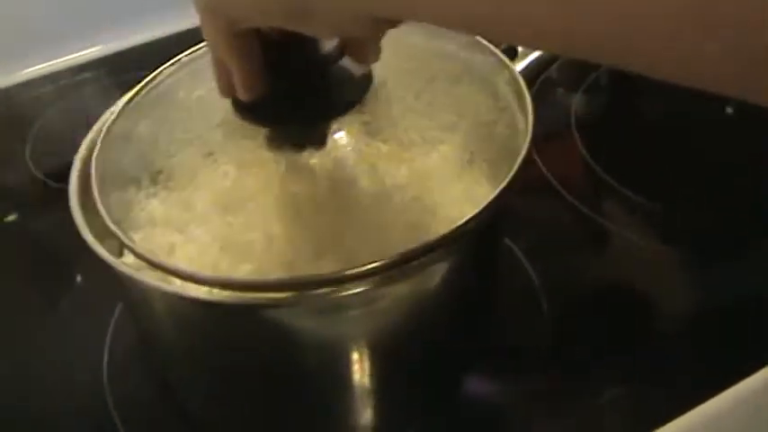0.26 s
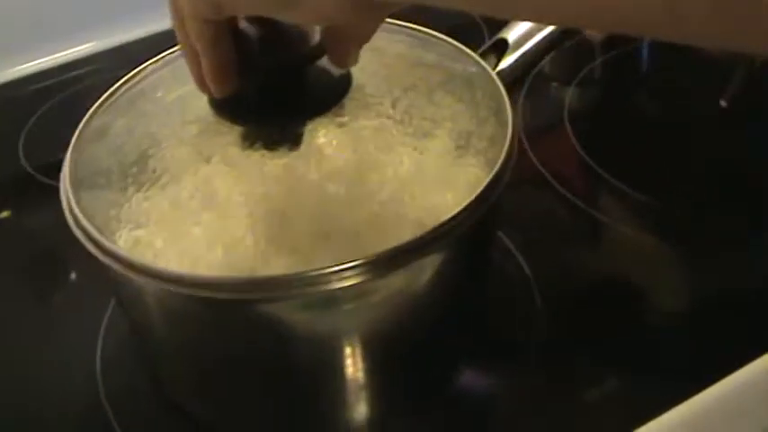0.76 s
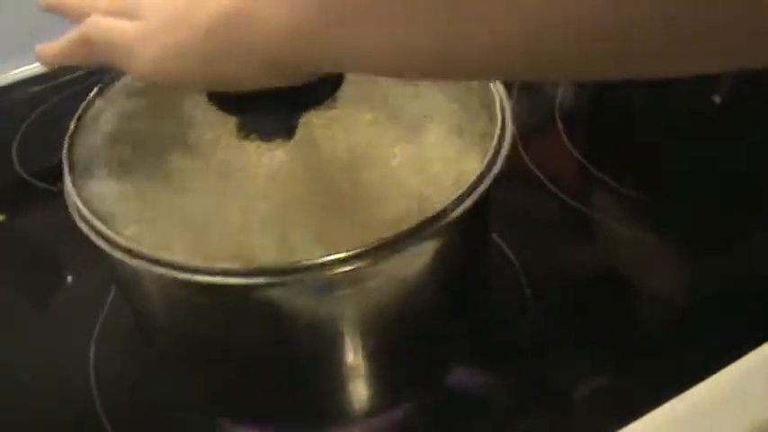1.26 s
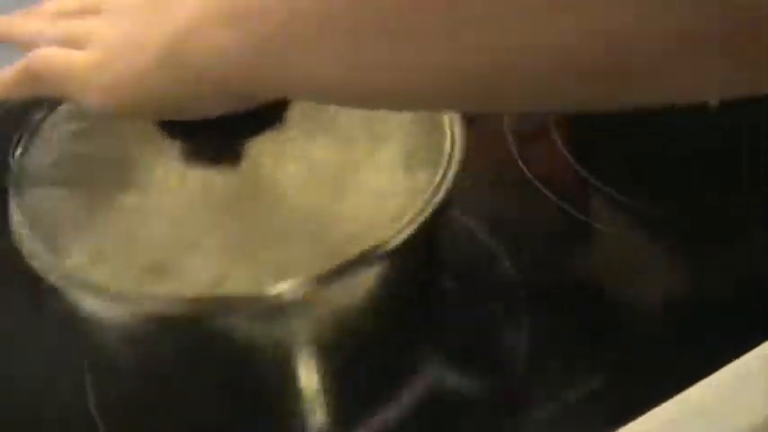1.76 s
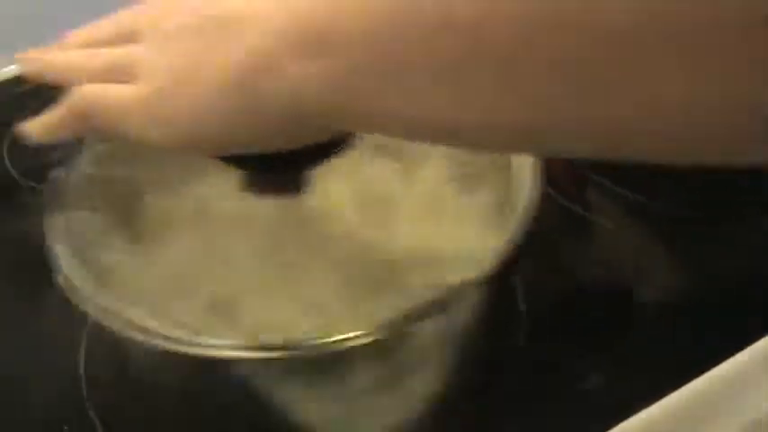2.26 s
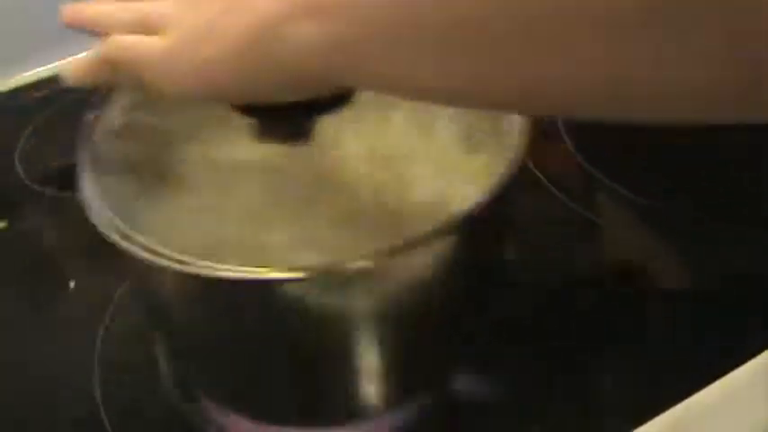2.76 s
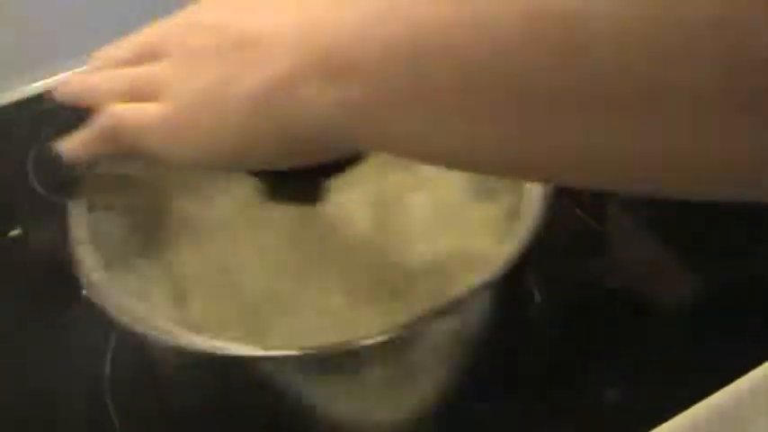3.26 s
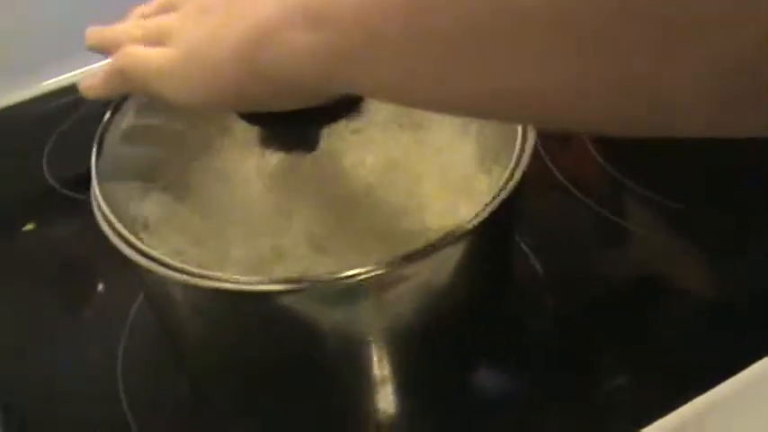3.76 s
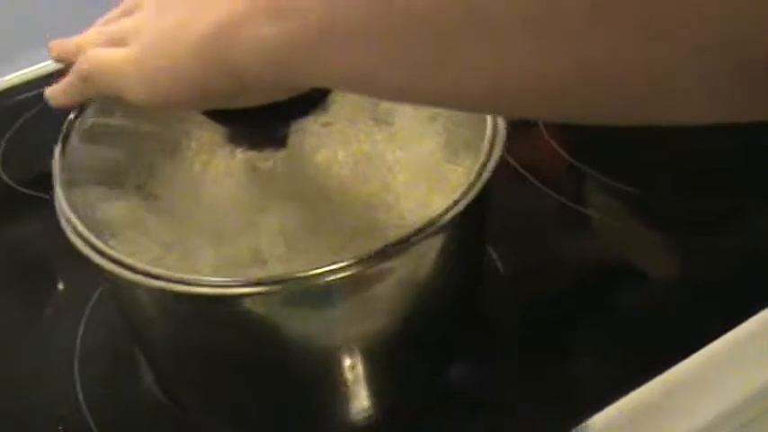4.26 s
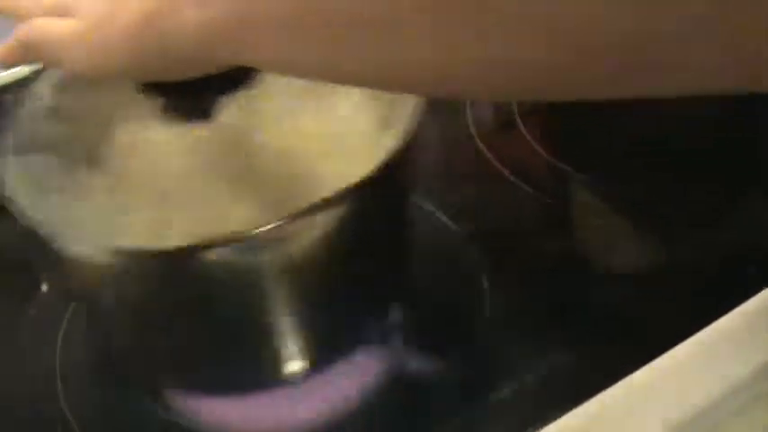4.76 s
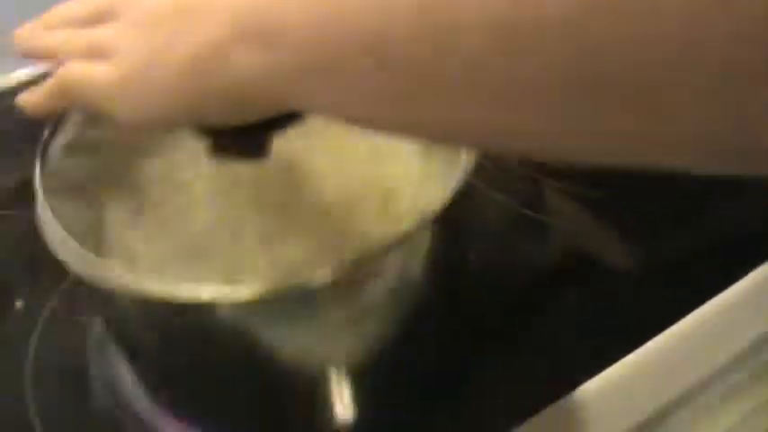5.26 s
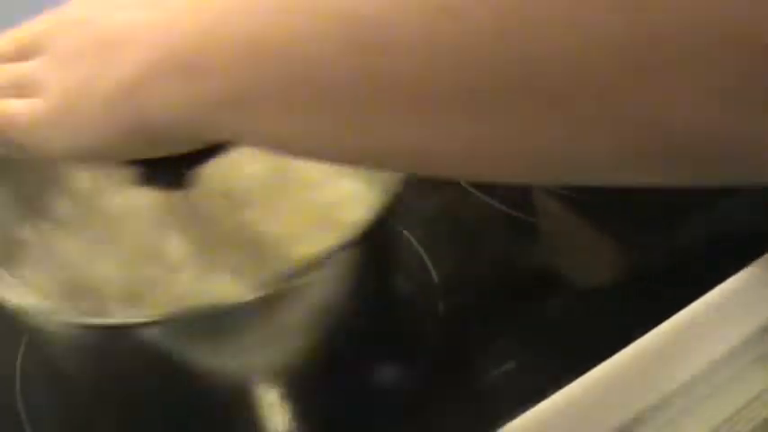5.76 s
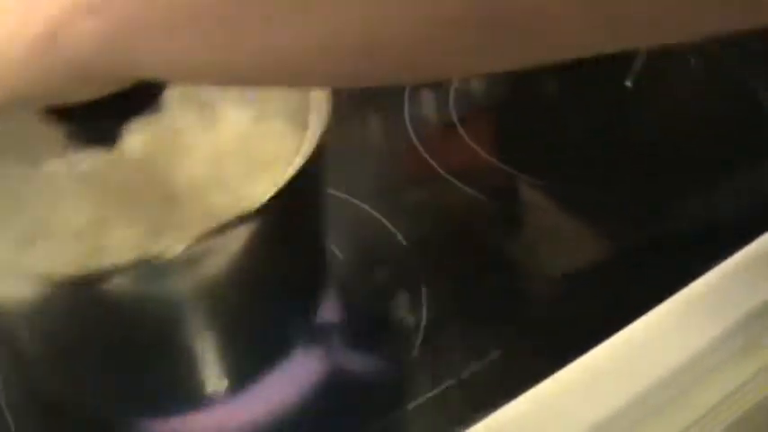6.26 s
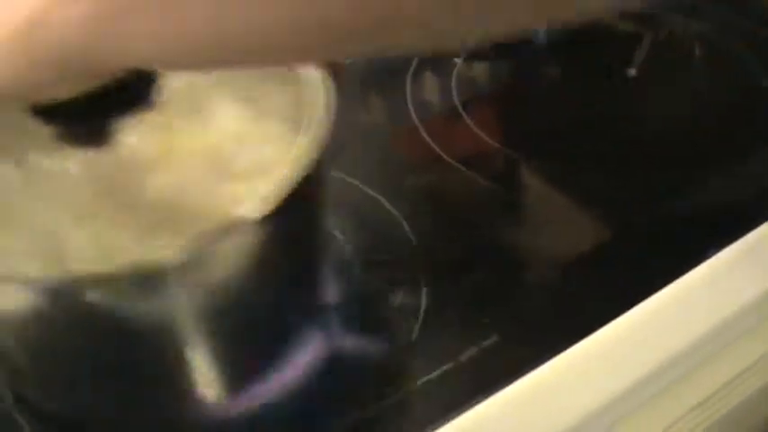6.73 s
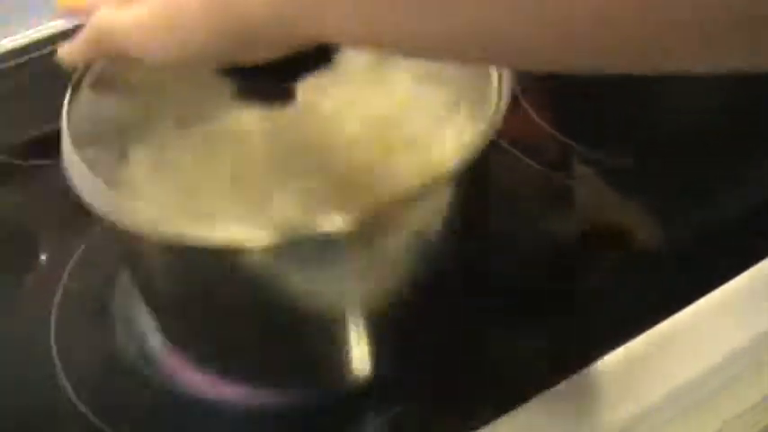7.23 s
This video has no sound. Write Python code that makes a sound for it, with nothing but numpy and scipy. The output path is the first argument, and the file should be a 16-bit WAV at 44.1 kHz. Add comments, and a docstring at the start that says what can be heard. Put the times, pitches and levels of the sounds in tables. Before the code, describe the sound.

Popcorn bursts with sharp cracks and hollow thumps in a lidded pan, which scrapes and rustles, knocks on the hob, then rings at the rim.

```python
"""Popcorn in a lidded saucepan

Popcorn pops under a glass lid, close to a camera in a kitchen. Each kernel cracks and rings the air in the pan.
The lid clacks and the pan knocks on the glass hob: noise bursts through resonances.
As the pan is shaken its base scrapes, corn rustles in sizzling oil and the rim sings: filtered random clicks.
Oil spits and steam hiss as coloured noise; the stove top rumbles below."""
import sys
import numpy as np
from scipy import signal
from scipy.fft import rfft, irfft, next_fast_len
from scipy.io import wavfile
from scipy.ndimage import map_coordinates

SR = 44100
rng = np.random.default_rng(int(sys.argv[2]) if len(sys.argv) > 2 else 0)


def store_pcm(level_fs):
    """Save levels as 16-bit WAV."""
    pcm = np.round(np.clip(level_fs, -1, 1) * 32767).astype(np.int16)
    wavfile.write(sys.argv[1], SR, np.atleast_2d(pcm).T)


N = 330529
T = np.arange(SR // 2) / SR  # s within one blow
T_SCENE = np.arange(N) / SR  # s

# bursting kernels: t/s, crack level/dB, pan air ring level/dB, thump level/dB, thump f/Hz
POPS = [(0.0447, -20, -33, -26, 485), (0.0649, -31, -23, -22, 468), (0.0923, -21, -27.5, -34, 337),
        (0.403, -25.5, -28, -21, 363), (0.4288, -19.5, -31.5, -25.5, 361), (0.6171, -44, -37.5, -31, 227),
        (0.7385, -28.5, -65, -59, 240), (0.843, -39.5, -38.5, -37.5, 220), (1.045, -35, -35, -36, 255),
        (1.0897, -25, -58, -50, 214), (1.135, -30, -37, -53, 203), (1.2799, -27.5, -34, -22.5, 232),
        (1.4518, -29, -36, -19.5, 242), (1.513, -30, -29.5, -23.5, 310), (1.79, -30.5, -27, -19.5, 254),
        (2.0294, -26, -37, -20, 266), (3.3489, -24, -24, -21.5, 304), (3.5085, -25, -26, -17.5, 317),
        (3.5265, -28, -28, -17, 347), (3.6145, -27.5, -27, -16.5, 312), (4.4945, -29, -27, -16.5, 330),
        (5.435, -30.5, -24.5, -16, 350), (5.7895, -31.5, -26, -18, 341), (6.5797, -24.5, -29.5, -17.5, 282)]
# pan knocks and grinds on hob: t/s, ring level/dB, thud level/dB, contact level/dB, contact length/s
KNOCKS = [(3.744, -25.5, -20, -22, 0.015), (3.766, -26, -22, -28, 0.017), (3.794, -23, -24, -25, 0.0092),
          (3.886, -28.5, -26.5, -42, 0.014), (3.927, -24, -19.5, -18.5, 0.0087),
          (3.94, -24.5, -21, -26, 0.02), (3.985, -26.5, -22, -26.5, 0.01),
          (4.106, -20.5, -18.5, -19.5, 0.015), (4.125, -36, -26, -32, 0.02),
          (4.2268, -24.5, -20, -22.5, 0.012), (4.41, -18, -17.5, -35, 0.014),
          (4.427, -34, -19.5, -19.5, 0.15), (4.476, -26, -25, -25, 0.025)]
# lid clacks on rim: t/s, ring level/dB, click level/dB
LID_CLACKS = [(0.187, -22.5, -27), (0.196, -22.5, -41), (0.633, -33.5, -38.5), (0.878, -38, -40.5),
              (1.19, -28, -32.5), (1.228, -25, -36), (1.664, -40, -43.5), (2.07, -35.5, -40),
              (2.461, -36.5, -58), (5.731, -25, -39)]
# heaps of corn tip over: onset t/s, peak level/dB
TUMBLES = [(2.535, -44.5), (2.662, -39), (2.875, -43), (3.0, -38.5), (3.195, -42.5), (3.295, -36),
           (4.909, -35), (5.09, -32), (5.2, -34.5), (5.39, -39), (5.645, -38), (6.048, -39), (6.279, -38.5),
           (6.424, -37.5), (6.815, -42), (6.85, -36), (6.914, -32.5), (7.172, -36.5), (7.205, -50)]
# effort of sliding the pan over the hob: t/s, effort level/dB
EFFORT = [(0.2, -44), (0.6, -78), (1.02, -85), (1.33, -47.5), (1.9, -49), (2.4, -49), (3.33, -46.5),
          (3.49, -51), (4.38, -53), (4.62, -45), (5.05, -44.5), (5.9, -41), (6.22, -48.5), (6.62, -38.5),
          (6.81, -46.5), (7.0, -43), (7.49, -41.5)]
# oil sizzle, shut in as the lid is slid closed: t/s, level/dB
OIL = [(0.08, -31.5), (0.24, -45.5), (0.56, -42), (0.8, -54)]
# rim rubs until it sings: peak t/s, peak level/dB
RUBS = [(6.34, -51), (7.06, -24.5), (7.405, -37.5)]
# hot oil spits: t/s, starting level/dB, t60/s
SPITS = [(1.3877, -40, 0.14), (1.487, -34.5, 0.083), (1.5, -28.5, 0.11), (1.8557, -26.5, 0.1),
         (1.869, -38, 0.11), (1.9064, -19.5, 0.023), (2.295, -34, 0.19), (4.834, -33, 0.093),
         (5.1536, -27, 0.11), (5.5054, -33, 0.06), (7.348, -31.5, 0.14)]
# steam jets under the lid: peak t/s, peak level/dB, half length to 1/e/s
JETS = [(0.01, -38, 0.013), (0.125, -28.5, 0.032), (0.461, -28.5, 0.033), (1.516, -28, 0.014),
        (6.628, -29.5, 0.033), (6.711, -36, 0.063), (7.019, -29.5, 0.06), (7.385, -38.5, 0.033)]

# resonances of the air in the pan: f/Hz, width/Hz, relative level/dB
CAVITY_MODES = [(494, 230, -8), (910, 82, -10.5), (1319, 65, 3.5), (1637, 34, 0.5), (2095, 95, -3),
                (2716, 98, -5), (3376, 250, -1.5), (4050, 130, -6), (4960, 220, -16)]
# resonances of the lid: f/Hz, width/Hz, relative level/dB
LID_MODES = [(216, 115, 6.5), (380, 40, -15), (794, 134, 4.5), (986, 43, -1.5), (1265, 87, 0),
             (1530, 23, -4.5), (2134, 56, -2), (2630, 42, -5), (3330, 23, -3), (4160, 26, -16)]
# resonances of the pan on the hob: f/Hz, width/Hz, relative level/dB
PAN_MODES = [(519, 25, 5), (824, 78, 2.5), (1007, 110, 2), (1340, 86, 0), (1900, 410, -24), (2230, 98, -9),
             (2720, 37, -25), (3390, 63, -9), (3920, 110, -16)]
# resonances of the rubbed rim: f/Hz, width/Hz, relative level/dB
RIM_MODES = [(891, 32, 5.5), (1084, 22, -5), (1270, 80, -5.5), (1550, 48, 0.5), (1916, 82, -11),
             (3150, 66, -14)]
# resonances of the hob top: f/Hz, width/Hz, relative level/dB
HOB_MODES = [(59.3, 1.5, 2), (77, 4.4, -7), (114.2, 3.3, 5.5), (145, 21, 2), (207.7, 21, 7.5),
             (241, 39, -2), (282.5, 21, 4), (319.3, 10, 3.5)]

# colour of hull cracks and lid clicks: f/Hz, relative level/dB
CRACK_COLOUR = [(50, -11), (200, 10), (700, -8.5), (1500, -4), (2800, -2.5), (4300, 4), (7500, 7.5),
                (9700, 0.5), (11500, -8), (13500, -22), (16000, -35)]
# colour of the hard pan contact: f/Hz, relative level/dB
STRIKE_COLOUR = [(100, 7.5), (400, 0), (1200, 4), (3000, 2), (7000, 0), (9700, -6.5), (11500, -15),
                 (13500, -40), (16000, -58)]
# colour of oil spits and steam: f/Hz, relative level/dB
SPIT_COLOUR = [(300, -23), (1500, -12), (4500, 3), (9800, 3.5), (12000, 0.5), (16000, -15)]
# colour of corn and oil: f/Hz, relative level/dB
SIZZLE_COLOUR = [(500, -3), (1800, -0.5), (3200, -0.5), (5000, 5), (8000, 3.5), (9800, -1.5), (11500, -7),
                 (13500, -14), (16000, -20)]
# colour of the sliding base: f/Hz, relative level/dB
SCRAPE_COLOUR = [(200, -33), (450, -9.5), (620, -6), (880, -0.5), (1400, -1), (2200, -7.5), (3500, -5.5),
                 (8000, -62)]
# colour of the stove top's rumble: f/Hz, relative level/dB
RUMBLE_COLOUR = [(20, -30), (40, -6), (57, 9), (85, -7.5), (120, 2.5), (170, -3.5), (300, 4.5), (420, -6),
                 (700, -18), (2000, -85)]

# kitchen echo decay: f/Hz, t60/s
KITCHEN = [(100, 0.29), (300, 0.37), (1500, 0.29), (5000, 0.31), (14000, 0.14)]
# stereo lean: f/Hz, left minus right level/dB
LEAN = [(60, 5.5), (250, 3.6), (500, -.5), (1200, 1.6), (4000, 1.4), (10000, 0)]
# phase between the microphone ports: f/Hz, left minus right phase/rad
PORTS = [(60, -.4), (330, -.8), (1000, 0), (6000, 0), (10000, .4), (11400, 2.6), (14300, 2.6), (15200, .8)]

TUMBLE_RISE_S, TUMBLE_FALL_S, TUMBLE_DRAG_DB = 0.0089, 0.031, -8  # drag relative to the heap's rustle
RUB_RISE_S, RUB_FALL_S = 0.041, 0.02  # to 1/e
USUAL_EFFORT_DB = -45
RUSTLE_DB, SCRAPE_DB, RUMBLE_DB = -45, -46, -51.5  # at the usual effort
RUSTLE_DB_PER_EFFORT_DB = 1.05
RUMBLE_MAX_RISE_DB, STOVE_REST_DB = 0.5, -56
BAND_TOP_HZ = 16000


def pops(tear_s=0.019, swell_s=0.00072, decay_cycles=2.28):
    """The hull tears; the puff of steam rings the pan's air modes and its deep cavity note."""
    out = np.zeros((2, N))
    for s, crack_db, ring_db, thump_db, thump_hz in POPS:
        hull = burst(tear_s, wet_db=-8, snap=7)
        crack = amp(crack_db) * blow(coloured(hull, CRACK_COLOUR))
        puff = burst(0.0093, wet_db=-4.5, snap=10.7)
        ring = amp(ring_db) * blow(resonate(puff, struck(CAVITY_MODES, scatter_db=6.0)))
        envelope = (1 - np.exp(-T / swell_s)) * np.exp(-T * thump_hz / decay_cycles)
        note = np.sin(2 * np.pi * thump_hz * T) * envelope
        thump = in_room(amp(thump_db) * blow(note), wet_db=-10.5)
        # the kick passes into the stove top
        jolt = amp(thump_db - 11) * blow(resonate(burst(0.0079, wet_db=-5.5), HOB_MODES))
        add(out, s, crack + ring + jolt + thump)
    return out


def knocks():
    """The base strikes the hob: a hard contact, the pan's ring and the long thud of the stove top."""
    out = np.zeros((2, N))
    for s, ring_db, thud_db, contact_db, length_s in KNOCKS:
        strike = burst(length_s, wet_db=-2.0, snap=1.3)
        contact = amp(contact_db) * blow(coloured(strike, STRIKE_COLOUR))
        pan_modes = struck(PAN_MODES, scatter_db=5.5)
        ring = amp(ring_db) * blow(resonate(burst(length_s, wet_db=1), pan_modes))
        hob_modes = struck(HOB_MODES, scatter_db=2.0)
        thud = amp(thud_db) * blow(resonate(burst(length_s, wet_db=-6.0), hob_modes))
        add(out, s, contact + ring + thud)
    return out


def lid():
    """The lid's steel band chatters briefly on the rim."""
    out = np.zeros((2, N))
    for s, ring_db, click_db in LID_CLACKS:
        ring = amp(ring_db) * blow(resonate(burst(0.0087, wet_db=-5.0), struck(LID_MODES)))
        click = amp(click_db) * blow(coloured(burst(0.016, wet_db=-3.5), CRACK_COLOUR))
        add(out, s, ring + click)
    return out


def shaking(effort_db, clump_db=2.0):
    """Corn moves in random clumps, which modulate its rustle, the base's scrape and the rim's song alike."""
    heaps = tipping()
    # one random value every 500 samples, smoothly joined
    clumps = map_coordinates(rng.standard_normal(N // 500 + 4), [np.arange(N) / 500])
    tumble = amp(clump_db * clumps)
    slips = grains(rate_hz=2500, spread_db=1.0)
    sound = rustle(effort_db, heaps) + scrape(effort_db, heaps, slips) + rim_song(slips)
    return in_room(tumble * sound, wet_db=-6.5)


def rustle(effort_db, heaps, ticks=0.15):
    """Fine sizzle and single kernel ticks; sliding, oil and tipping heaps add in power."""
    crackle = grains(rate_hz=9000, spread_db=2) + ticks * grains(rate_hz=200, spread_db=4)
    slid = amp(RUSTLE_DB + RUSTLE_DB_PER_EFFORT_DB * effort_db)
    oil = amp(curves(OIL)[0])
    stir = np.sqrt(slid ** 2 + oil ** 2 + heaps ** 2)
    return stir * unit(coloured(crackle, SIZZLE_COLOUR))


def scrape(effort_db, heaps, slips):
    """Tiny slips of the base, with some rim resonance; heaps also drag on the pan's floor."""
    drag = np.hypot(amp(SCRAPE_DB + effort_db), amp(TUMBLE_DRAG_DB) * heaps)
    base = unit(coloured(slips, SCRAPE_COLOUR))
    rim = 0.18 * unit(resonate(slips, RIM_MODES))
    return drag * unit(base + rim)


def rim_song(slips):
    """The same slips excite the rubbed rim's resonances in brief swells."""
    return swells(RUBS, RUB_RISE_S, RUB_FALL_S) * unit(resonate(slips, RIM_MODES))


def tipping():
    """Gain of the tipping heaps: each gathers linearly, then settles exponentially."""
    gain = np.zeros(N)
    for s, db in TUMBLES:
        age = T_SCENE - s
        gather = np.clip(age / TUMBLE_RISE_S, 0, 1)
        settle = np.exp(-np.maximum(age - TUMBLE_RISE_S, 0) / TUMBLE_FALL_S)
        gain += amp(db) * gather * settle
    return gain


def spits():
    """Short bright hisses as moisture meets the hot oil."""
    out = np.zeros((2, N))
    for s, db, t60_s in SPITS:
        hiss = unit(coloured(rng.laplace(size=len(T)), SPIT_COLOUR)) * amp(-60 * T / t60_s)
        add(out, s, in_room(amp(db) * hiss, wet_db=-4.5))
    return out


def steam():
    """Steam swells and fades through the gap under the lid: noise under Gaussian envelopes."""
    flow = sum(amp(db) * np.exp(-((T_SCENE - s) / half_s) ** 2) for s, db, half_s in JETS)
    hiss = unit(coloured(rng.standard_normal(N), SPIT_COLOUR))
    return in_room(flow * hiss, wet_db=-7.5)


def rumble(effort_db):
    """Sliding shakes the stove top, over a steady low rumble at rest."""
    level = amp(RUMBLE_DB + np.minimum(effort_db, RUMBLE_MAX_RISE_DB)) + amp(STOVE_REST_DB)
    return in_room(level * unit(coloured(rng.standard_normal(N), RUMBLE_COLOUR)), wet_db=-22)


def burst(length_s, wet_db, snap=0):
    """A first snap and a brief cluster of tiny fractures or contacts, with the room's echo."""
    cluster = rng.standard_normal(len(T)) * np.exp(-(T / length_s) ** 2)
    cluster[0] += snap
    return cluster / np.linalg.norm(cluster) + amp(wet_db) * room_tail()


def struck(modes, scatter_db=3, detune=0.018):
    """Each blow lands elsewhere and finds corn and lid shifted: new strengths, slightly new pitches."""
    chance = rng.standard_normal((len(modes), 2))
    return [(hz * (1 + detune * a), width_hz, db + scatter_db * b)
            for (hz, width_hz, db), (a, b) in zip(modes, chance)]


def grains(rate_hz, spread_db):
    """Random tiny clicks of uneven size, scaled to rms 1."""
    hits = rng.random(N) < rate_hz / SR
    return unit(hits * rng.standard_normal(N) * amp(spread_db * rng.standard_normal(N)))


def swells(rows, rise_s, fall_s):
    """Summed gain of swells that grow and die exponentially."""
    return sum(amp(db) * np.exp(-np.maximum((s - T_SCENE) / rise_s, (T_SCENE - s) / fall_s))
               for s, db in rows)


def room_tail(wide=0.54):
    """A fresh diffuse kitchen echo, mid energy 1; long waves reach both ports alike."""
    hz, t, z = signal.stft(rng.standard_normal((2, len(T))), SR, nperseg=256)
    z[1] *= np.minimum(hz / 600, 1)[:, None]  # less side below 600 Hz
    decay = amp(-60 * t / along(KITCHEN, hz)[:, None])
    onset = 1 - np.exp(-t / 0.0009)
    tails = signal.istft(z * decay * onset, SR, nperseg=256)[1][:, :len(T)]
    mid, side = tails / np.linalg.norm(tails[0])
    return np.array([mid + wide * side, mid - wide * side])


def in_room(x, wet_db):
    """The direct sound plus its echo."""
    return x + amp(wet_db) * signal.fftconvolve(x[None], room_tail(), axes=1)[:, :len(x)]


def add(track, s, sound):
    """Mix a stereo sound in at s seconds."""
    part = track[:, max(round(s * SR), 0):][:, :sound.shape[1]]
    part += sound[:, :part.shape[1]]


def amp(db):
    """Decibels to gain."""
    return 10 ** (np.asarray(db) / 20)


def unit(x):
    """Scale to rms 1."""
    return x / np.sqrt(np.mean(x ** 2) + 1e-20)


def blow(x):
    """Scale a blow to the energy of 20 ms at rms 1."""
    return unit(x) * np.sqrt(SR * .02 / len(T))


def along(points, hz):
    """Read (f/Hz, value) points on a log frequency axis."""
    f, v = np.transpose(points)
    return np.interp(np.log(hz + 1), np.log(f), v)


def curves(rows):
    """One value per sample for each column after the time."""
    s, *cols = np.transpose(rows)
    return [np.interp(T_SCENE, s, c) for c in cols]


def filtered(x, response):
    """Multiply the spectrum of x by a response of frequency, zero-padded."""
    n = x.shape[-1]
    m = 2 * next_fast_len(n // 2 + 4096)
    return irfft(rfft(x, m) * response(np.fft.rfftfreq(m, 1 / SR)), m)[..., :n]


def coloured(x, points):
    """Causal minimum-phase filter with the gain of (f/Hz, level/dB) points."""
    def response(hz):
        cepstrum = irfft(np.log(amp(along(points, hz))))
        cepstrum[len(cepstrum) // 2:] = 0  # fold onto positive times
        cepstrum[1:] *= 2
        return np.exp(rfft(cepstrum))
    return filtered(x, response)


def resonate(x, modes):
    """Pass x through parallel second-order band-pass resonances."""
    def response(f):
        return sum(amp(db) * 1j * f * w / (c * c - f * f + 1j * f * w) for c, w, db in modes)
    return filtered(x, response)


def scene():
    """Everything sounds from the pan, a little left of the camera."""
    effort_db = curves(EFFORT)[0] - USUAL_EFFORT_DB
    dry = pops() + knocks() + lid() + shaking(effort_db) + spits() + steam() + rumble(effort_db)

    def ports(hz):
        left = amp(along(LEAN, hz) / 2) * np.exp(1j * along(PORTS, hz) / 2)
        return np.array([left, 1 / left])
    return filtered(dry, ports)


def record(dry, bass_hz=50, ceiling=0.62):
    """The camera thins the deep bass, rounds off the highest peaks and keeps nothing above its band limit."""
    thin = filtered(dry, lambda hz: 1j * hz / (bass_hz + 1j * hz))
    rounded = thin / (1 + (thin / ceiling) ** 4) ** (1 / 4)
    return filtered(rounded, lambda hz: hz < BAND_TOP_HZ)


dry = scene()
out = record(dry)
store_pcm(out)
```